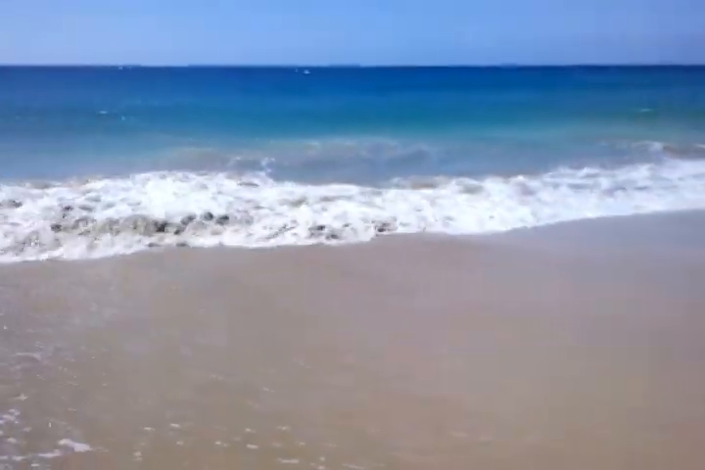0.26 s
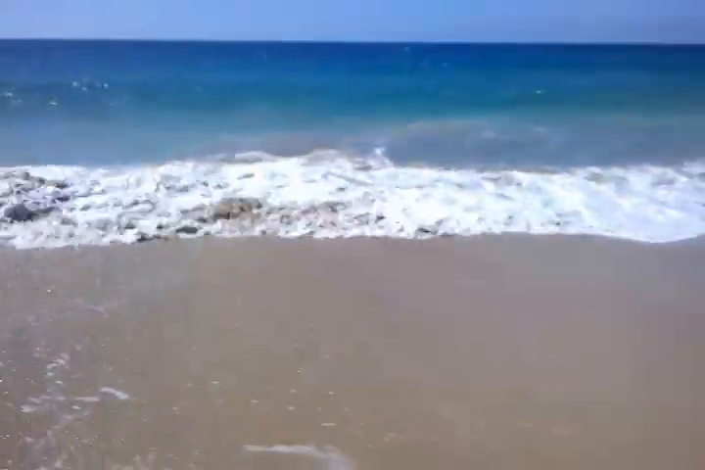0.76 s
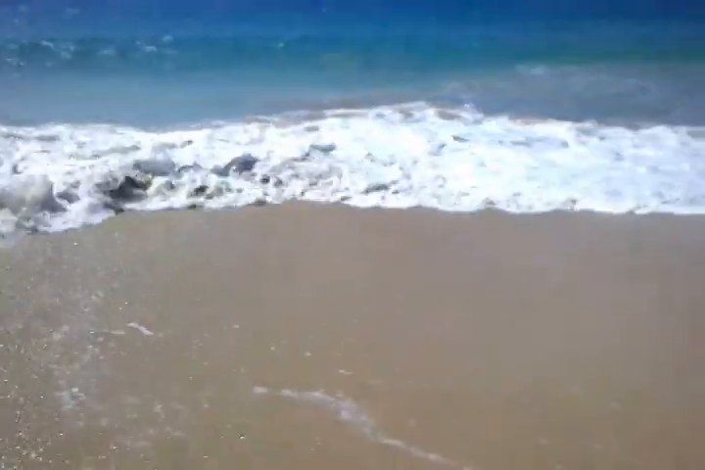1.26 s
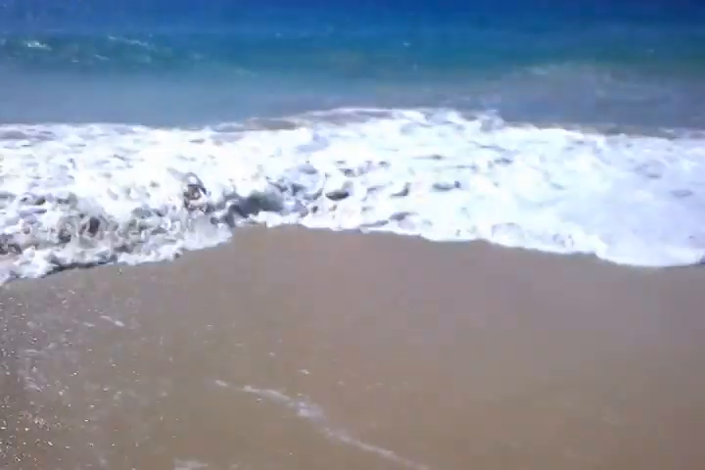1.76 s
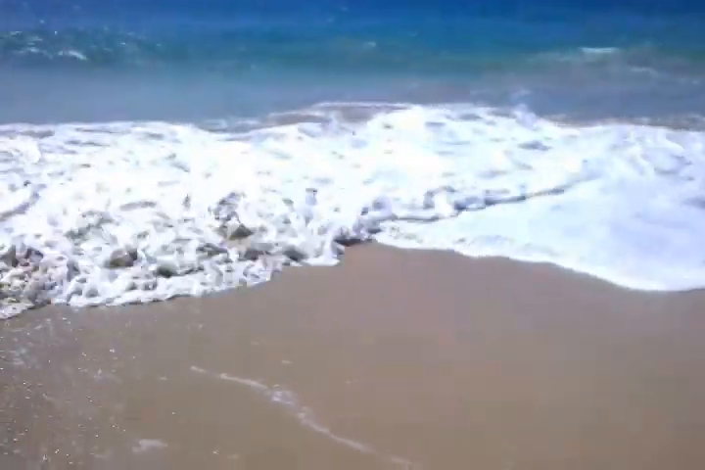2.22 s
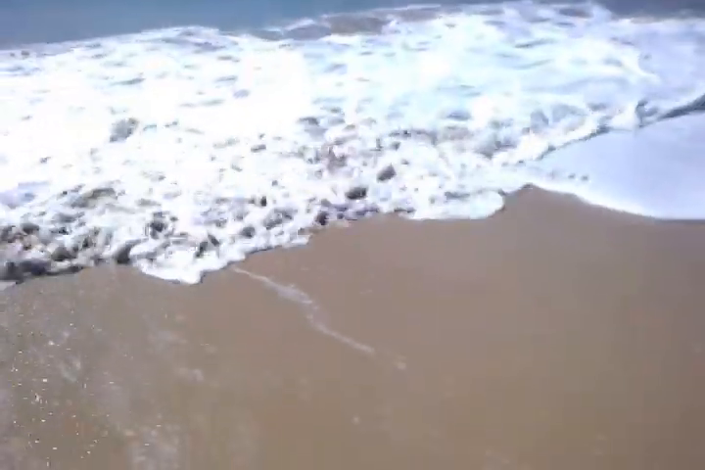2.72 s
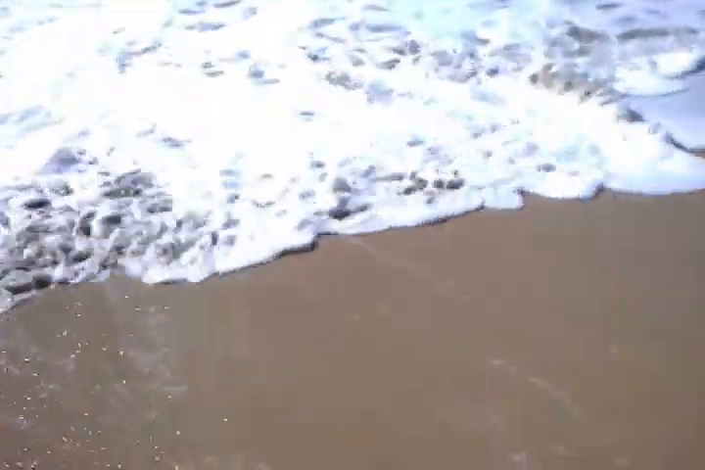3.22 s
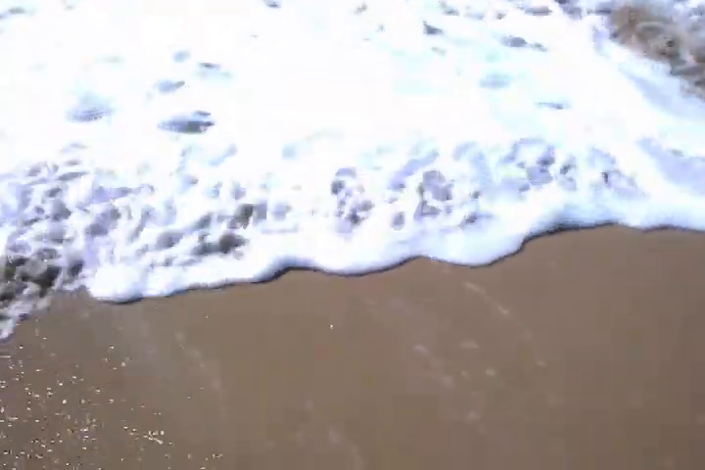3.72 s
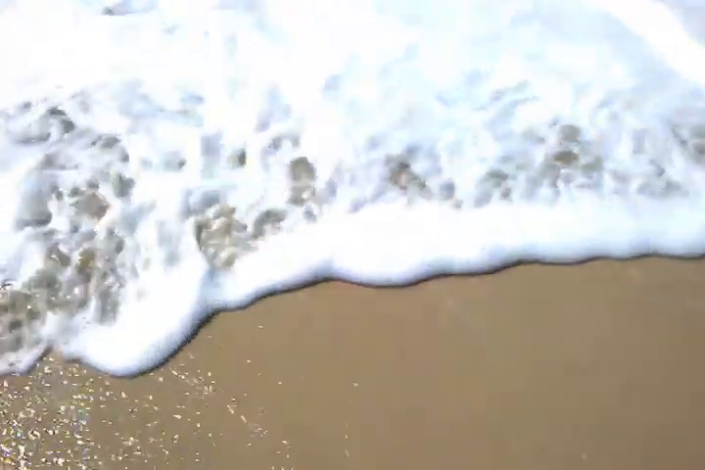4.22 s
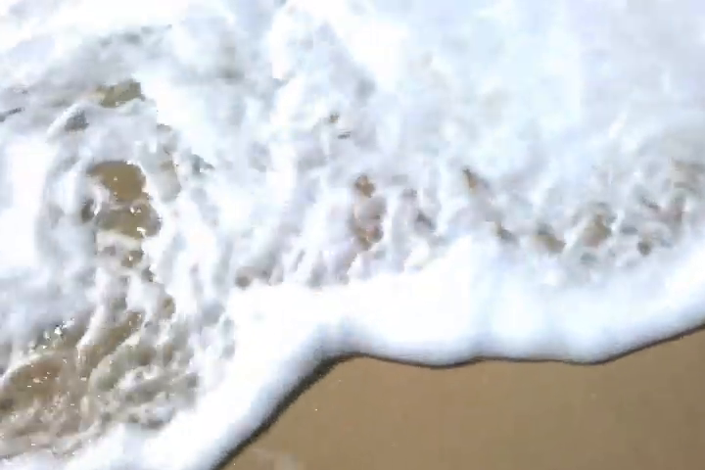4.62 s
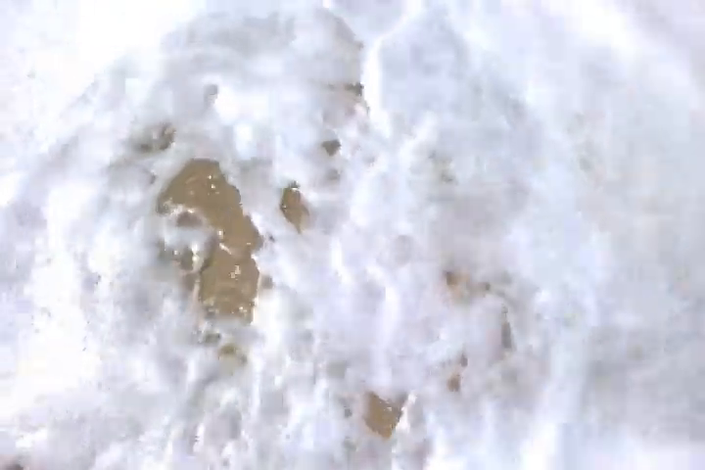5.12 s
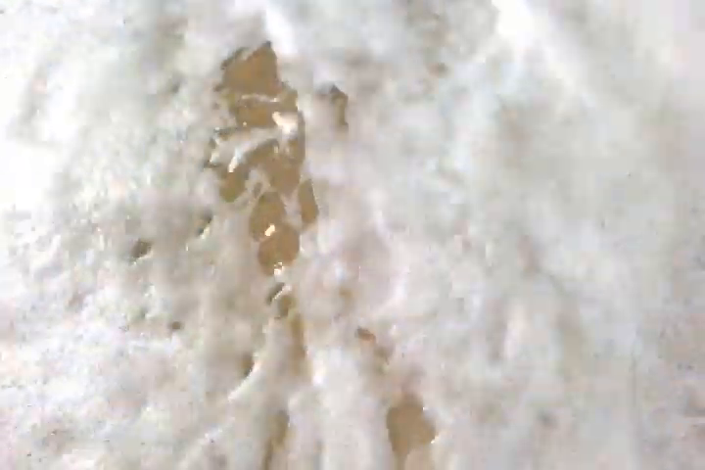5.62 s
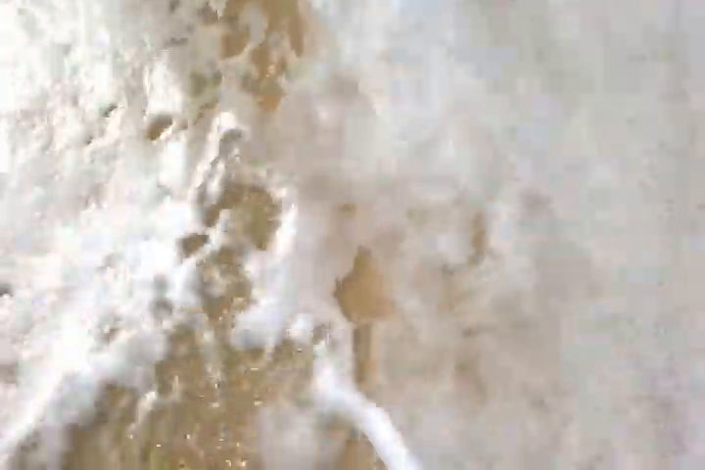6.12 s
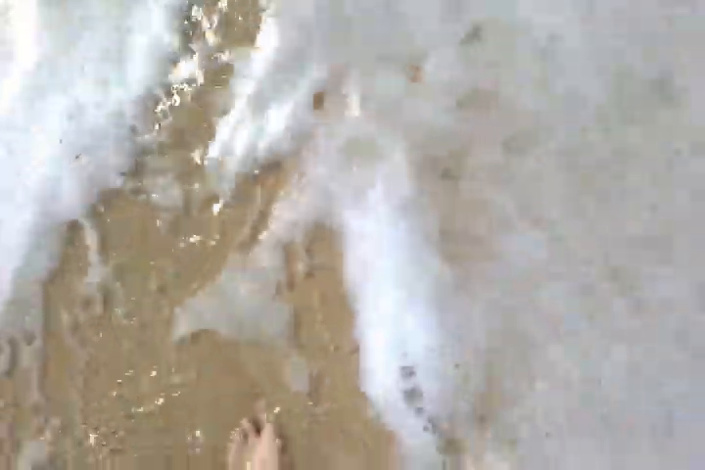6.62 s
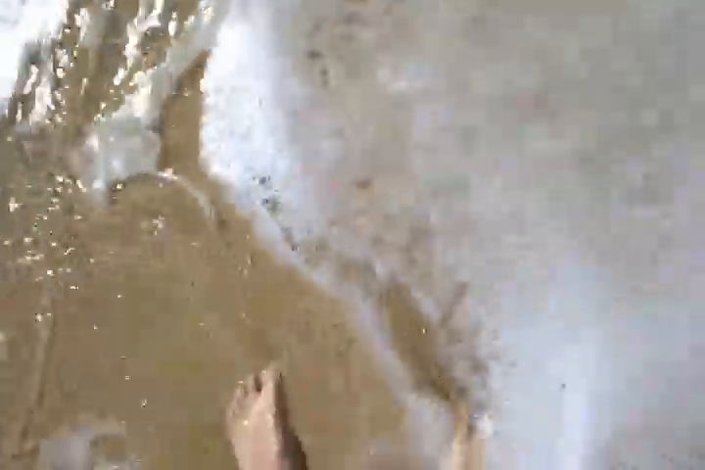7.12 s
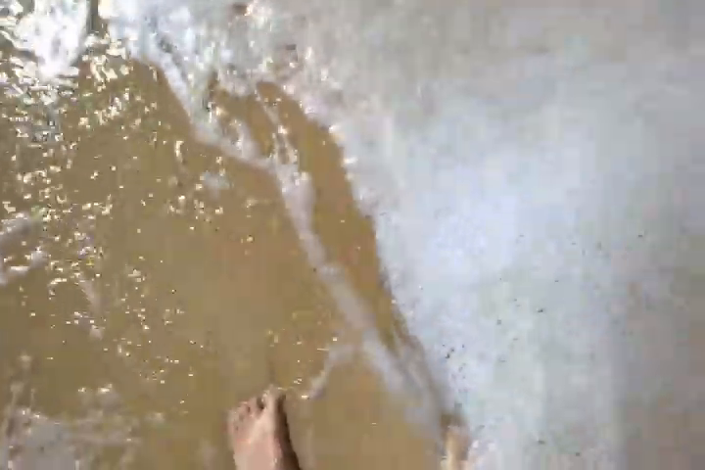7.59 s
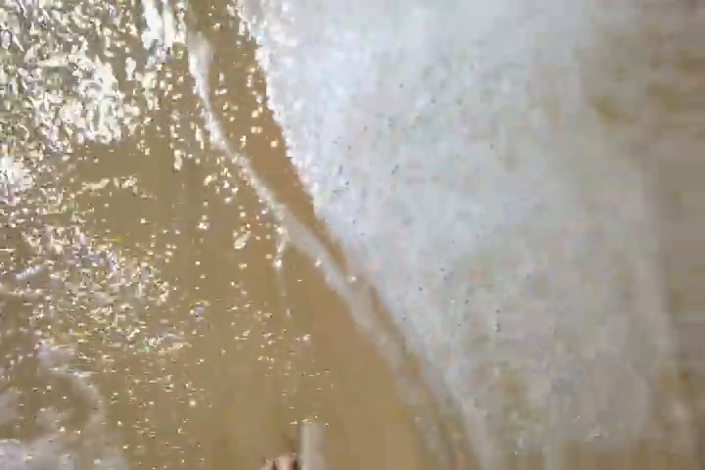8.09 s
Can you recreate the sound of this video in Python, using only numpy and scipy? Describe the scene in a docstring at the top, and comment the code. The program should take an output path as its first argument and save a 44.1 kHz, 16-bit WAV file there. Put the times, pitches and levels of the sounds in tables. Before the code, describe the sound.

Surf rushes on a sandy beach, then drops to a softer wash while a sea breeze thuds on a small hand-held microphone. About halfway through, the wave arrives close by, swelling into a louder churn of hissing, bubbling foam. It falls away again to a faint fizz, and the wind takes over with a flurry of sharp crackles and pops on the microphone.

```python
"""A wave on a windy beach

A broken wave runs up the sand and fizzes out: countless bubbles and churning foam.
A sea breeze thuds, crackles and snaps on the two microphone openings (ports) of a small
hand-held recorder, mostly the right one. The recorder makes its stereo by taking from
each port a slightly delayed copy of the other."""
import sys
import numpy as np
from scipy import signal
from scipy.io import wavfile
from scipy.ndimage import uniform_filter1d

SR = 44100
rng = np.random.default_rng(int(sys.argv[2]) if len(sys.argv) > 2 else 0)


def unload_wav(signal):
    """Save mono or channel-first audio to the path in sys.argv[1] as 16-bit WAV at rate SR, clipped to [-1, 1]."""
    wavfile.write(
        sys.argv[1],
        SR,
        np.round(np.clip(np.atleast_2d(signal).T, -1, 1) * 32767).astype(np.int16),
    )


N = 368226


def from_db(db):
    """Turn decibels into a number to multiply by."""
    return 10 ** (np.asarray(db) / 20)


def unit_level(x):
    """Scale a sound so that its average power is 1."""
    return x / np.sqrt(np.mean(x ** 2) + 1e-20)


def curves(rows):
    """Join a table's rows with straight lines: one value per sample for each column after the time."""
    time_s, *columns = np.transpose(rows)
    return np.array([np.interp(np.arange(N) / SR, time_s, column) for column in columns])


def drift(rate_hz):
    """A slow random wobble, about 1 in size."""
    pole = np.exp(-2 * np.pi * rate_hz * 40 / SR)   # one step per 40 samples
    slow = signal.lfilter([1], [1, -2 * pole, pole ** 2], rng.standard_normal(N // 40 + 2002))[2000:]
    return np.interp(np.arange(N) / 40, np.arange(len(slow)), unit_level(slow))


def passband(x, hz, kind, order=2):
    """Keep the "low" side of hz, the "high" side, or the "band" between two pitches."""
    return signal.sosfilt(signal.butter(order, hz, kind, fs=SR, output="sos"), x)


def between(x, low_hz, high_hz):
    """Cut the lows, then the highs."""
    return passband(passband(x, low_hz, "high"), high_hz, "low")


def clicks(per_s, spread_db):
    """Two channels of random clicks, uneven in size and sign."""
    sizes = from_db(spread_db * np.minimum(rng.exponential(1, (2, N)), 4))
    signs = rng.choice([-1, 1], (2, N))
    return sizes * signs * (rng.random((2, N)) < per_s / SR) + 1e-18


def steadied(x, window_ms):
    """Even out the slow ups and downs of a noise."""
    x = x / x.std()
    return x / np.sqrt(uniform_filter1d(x ** 2, int(window_ms * SR / 1000), axis=-1) + 1e-9)


PART_HZ = (400, 1200, 4500, 11000)   # centres of rumble, wash, hiss and fizz
DIFFUSE_HZ, DIFFUSE_SHARE = 4720, 0.7   # above this pitch, this share is unrelated in each channel
# Level of the surf as heard; it ducks abruptly at 0.56 s and 6.5 s:
# time_s, rumble_db, wash_db, hiss_db, fizz_db
SURF_LEVELS = [(0.0, -23.5, -25, -36, -36.5), (0.28, -26, -27, -35, -37.5), (0.42, -28, -30, -39, -40),
               (0.553, -28.5, -34, -40, -43), (0.566, -36, -41.5, -48.5, -51),
               (0.8, -35.5, -40.5, -49, -50.5), (1.3, -33, -40, -47, -48), (1.55, -38, -43.5, -47, -50),
               (2.3, -38, -41.5, -46, -47), (3.1, -39, -42, -45, -46), (3.6, -33, -43.5, -45.5, -45),
               (4.4, -36.5, -41, -42, -40.5), (4.52, -35.5, -36, -37.5, -39), (4.8, -28.5, -29.5, -33, -32),
               (5.05, -23.5, -31, -33, -32), (5.6, -22, -34.5, -35.5, -33.5), (6.1, -22, -36, -37.5, -35),
               (6.25, -24, -40.5, -41, -39.5), (6.42, -26.5, -36.5, -45, -40),
               (6.5, -33.5, -41.5, -50, -45.5), (7.0, -34, -43, -51, -49.5), (7.6, -38.5, -47, -53, -50.5),
               (8.35, -34, -46.5, -53.5, -50)]
# The surf's tone: pitch_hz, level_db, port_likeness (1 same, -1 or less opposite), right_louder_db
SURF_TONE = [(82, -29, 0.32, -21), (183, -22, 0.97, -13), (357, -25.5, 1, -1), (603, -38.5, 0.84, -15),
             (713, -32, 1, 2), (960, -38.5, -0.08, -8), (1234, -36.5, 0.65, -3.5), (1833, -33, -1.5, 11),
             (2060, -35, -0.015, 9), (2340, -40, 0.17, 4.5), (2750, -41.5, 0.19, -1.5),
             (3870, -38, -0.25, -6), (4820, -42, -0.5, -2.5), (6900, -38, -0.18, -4), (8420, -41, 0, 3),
             (9770, -37.5, 0.094, -8.5), (12150, -45.5, 0.32, -10)]
# Extra level for the deepest rumble: time_s, boost_db
DEEP_RUMBLE = [(0, -9), (.3, 1), (.56, 5.5), (.7, 6.5), (1.5, 6), (2.5, -3.5), (3.2, 2), (4.2, 1.5),
               (5, -1), (5.6, -4), (6.2, -4.5), (6.8, 0.5), (7.4, 1.5), (8.35, -1)]


def surf(slosh_db, flicker_db, grain):
    """Countless bubbles blend into bands of noise. Returns the port sound and the diffuse treble."""
    parts_db, deep_db = curves(SURF_LEVELS), curves(DEEP_RUMBLE)[0]
    tone_hz, *tone = np.transpose(SURF_TONE)
    edges_hz = 74 * 2 ** (np.arange(24) / 3)   # three bands per octave
    noise = rng.standard_normal((2, 4, N))   # two sets, so neighbouring bands use different noise
    noise[:, 0] += grain * unit_level(clicks(per_s=900, spread_db=0.5))   # single bubbles nearby
    noise[:, 0] /= np.sqrt(1 + grain ** 2)
    ports, diffuse_treble = np.zeros((2, 2, N))
    slosh = drift(9.4)
    for band, (low, high) in enumerate(zip(edges_hz, edges_hz[1:])):
        hz = np.sqrt(low * high)
        tone_db, likeness, right_db = (np.interp(np.log(hz), np.log(tone_hz), col) for col in tone)
        likeness = np.clip(likeness, -1, 1)
        part_mix = [np.interp(np.log(hz), np.log(PART_HZ), part) for part in np.eye(4)]
        wobble_db = slosh_db * slosh + flicker_db * drift(13.8)
        wobble_db *= (1000 / hz) ** 0.071   # fine fizz is the steadiest
        boost_db = np.interp(hz, (130, 260), [1, 0]) * deep_db   # fades out from 130 to 260 Hz
        gain = from_db(part_mix @ parts_db + boost_db + tone_db + wobble_db) * np.sqrt(SR / 2)
        share = DIFFUSE_SHARE * (hz > DIFFUSE_HZ)
        band_noise = gain * passband(noise[band % 2, :4 if share else 2], [low, high], "band")
        same = np.sqrt((1 + likeness) / 2) * band_noise[0]
        opposite = np.sqrt((1 - likeness) / 2) * band_noise[1] * [[1], [-1]]
        ports += np.sqrt(1 - share) * (same + opposite) * from_db([[-right_db / 2], [right_db / 2]])
        if share:
            diffuse_treble += np.sqrt(2 * share) * band_noise[2:]
    return ports, diffuse_treble


# The breeze at both ports: time_s, level_db, boom_share (0 all thud, 1 all boom)
BREEZE_LEVELS = [(0, -27, 0.92), (.3, -32, 0.92), (.52, -22, 0.99), (.65, -34, 0.34), (1.1, -31, 0.7),
                 (1.4, -35, 0.1), (1.7, -33.5, 1), (2.4, -35, 0.93), (2.9, -29.5, 0.96), (3.5, -33, 0.96),
                 (4.2, -30.5, 0.23), (4.5, -27.5, 0.57), (5.3, -33.5, 0.53), (5.8, -41, 0.16),
                 (6.3, -33, 0.4), (6.6, -44, 0.18), (7.3, -29, 0.5), (7.8, -39, 0.18), (8.35, -30.5, 0.55)]
# Puffs on the right port: peak_s, level_db, length_ms, crackle_db (compared with the puff)
WIND_PUFFS = [(0.301, -15, 14, -30), (0.352, -15, 21, -10), (0.508, -18, 7.4, -30), (0.551, -8, 8.7, -24),
              (0.575, -15, 10, -25), (0.586, -5, 2.9, -21), (0.661, -20, 14, -11), (0.687, -13.5, 18, -24),
              (0.727, -19, 38, -32), (0.818, -20, 14, -28), (0.877, -12.5, 8.2, -23), (0.948, -12, 18, -38),
              (1.053, -16, 8.1, -30), (1.1, -15.5, 49, -38), (1.189, -25, 27, -30),
              (1.225, -21.5, 38, -7.5), (1.286, -11, 9.4, -42), (1.323, -12, 12, -35),
              (1.361, -17.5, 45, -17), (1.399, -13, 19, -22), (1.439, -11.5, 11, -22),
              (1.465, -24, 14, -30), (1.622, -20, 36, -26), (1.648, -24, 28, -27), (2.735, -21, 22, -30),
              (2.957, -22, 12, -32), (3.21, -24, 17, -34), (3.247, -13.5, 7.6, -37), (3.407, -17, 48, -29),
              (3.542, -21, 27, -30), (3.615, -18.5, 22, -34), (3.651, -20, 31, -35), (3.71, -13, 5, -34),
              (3.988, -12.5, 6.5, -36), (4.04, -21.5, 24, -29), (4.407, -16, 14, -29),
              (4.535, -20, 40, -27), (5.055, -19, 21, -28), (5.209, -17, 7, -30), (5.506, -16, 38, -30),
              (6.204, -18, 12, -8), (6.271, -15, 14, -29), (6.425, -9.5, 12.5, -11),
              (6.451, -16.5, 24, -14), (6.486, -16, 29, -6), (6.661, -15, 31, -13), (6.674, -22, 7.4, -2),
              (6.743, -12, 9.9, -11), (6.776, -23, 7.9, -6), (6.849, -12, 5.6, -11), (6.864, -13, 3.6, -5),
              (6.889, -10, 4.8, -2), (6.97, -20, 5.3, -10), (6.978, -16, 5.8, -7.5), (7.004, -19.5, 14, -4),
              (7.017, -13, 11, -10), (7.048, -13.5, 6, -18), (7.11, -15.5, 6.6, 0), (7.157, -22, 12, -7),
              (7.191, -14, 23, -11), (7.212, -16, 19, -7), (7.231, -16, 22, -3.5), (7.252, -16.5, 35, -8),
              (7.277, -19, 23, -7), (7.294, -16, 8, -3), (7.304, -21, 49, -4), (7.336, -18, 17, 1.5),
              (7.349, -15.5, 11, 1.5), (7.362, -20, 19, -2), (7.378, -19.5, 22, -0.5), (7.394, -20, 7, 7),
              (7.407, -21, 7.3, -3), (7.492, -21, 28, -14), (7.509, -19.5, 14, -1), (7.527, -15, 18, -4),
              (7.589, -22, 11, -7), (7.739, -20.5, 16, -21), (7.837, -17, 10, -5.5),
              (7.881, -21.5, 42, -27), (8.118, -22, 11, -12), (8.141, -17, 12, -11), (8.153, -15, 9, -16),
              (8.164, -15, 4.8, -12), (8.216, -31, 29, 2), (8.251, -10, 12, -7), (8.263, -15, 9.2, -3),
              (8.276, -15, 3.5, -11), (8.287, -18, 5, -12), (8.299, -24, 6.6, -7), (8.325, -32, 8, 0)]


def wind(wobble_db, crackle_db):
    """Slow air sheds big swirls that boom, fast air small ones that thud; hard puffs make them crackle."""
    swirls = clicks(per_s=700, spread_db=5.5)
    breeze_db, boom_share = curves(BREEZE_LEVELS)
    boom_share = np.clip(boom_share, 0, 1)
    boom = unit_level(between(swirls, low_hz=91, high_hz=157))
    thud = unit_level(between(swirls, low_hz=157, high_hz=300))
    buffet = steadied(np.sqrt(boom_share) * boom - np.sqrt(1 - boom_share) * thud, window_ms=16.2)
    crackle = passband(between(swirls, low_hz=291, high_hz=497), 2200, "low")
    crackle = steadied(crackle, window_ms=11.9)
    side_db = np.array([[0.5], [-0.5]])   # left, right
    breeze = from_db(breeze_db + side_db + wobble_db * np.array([drift(4.7), drift(3.4)]))
    buffet_power, crackle_power = breeze ** 2, (breeze * from_db(crackle_db)) ** 2
    for peak_s, level_db, length_ms, puff_crackle_db in WIND_PUFFS:
        at = np.arange(max(int((peak_s - .1) * SR), 0), min(int((peak_s + .1) * SR), N))
        width_s = np.where(at / SR < peak_s, .7, 1.3) * length_ms / 2500   # comes faster than it goes
        bump = np.exp(-.5 * ((at / SR - peak_s) / width_s) ** 2)
        buffet_power[1, at] += bump * from_db(2 * level_db)
        crest = bump ** 2.4   # only the top of the puff crackles
        crackle_power[1, at] += crest * from_db(2 * (level_db + puff_crackle_db))
    buffet = passband(buffet * np.sqrt(buffet_power), 442, "low", order=4)
    buffet = passband(buffet, 57, "high", order=1)
    return buffet + crackle * np.sqrt(crackle_power)


def water_drop(start_s, level_db, pitch_hz, fade_s):
    """One bright drop at both ports: a ring, roughened by noise, that dies by 60 dB in fade_s."""
    t = np.arange(1500) / SR
    ring = from_db(level_db - 60 * t / fade_s) * np.sin(2 * np.pi * pitch_hz * t)
    roughness = unit_level(passband(rng.standard_normal(len(t)), 360, "low"))
    start = int(start_s * SR)
    return np.pad(ring * roughness, (start, N - start - len(t)))


SNAP_RISE_CYCLES, SNAP_FALL_CYCLES, SNAP_TOP_HZ = 0.38, 0.34, 1450
CRACK_LOW_HZ, CRACK_HIGH_HZ, CRACK_10_DB_MS = 1190, 2270, 0.46
# Sharp snaps of wind: peak_s, level_db, pitch_hz, crack_db (compared with the snap)
WIND_SNAPS = [(0.5045, -12, 533.0, -12), (0.5501, -7, 531.0, -17), (0.587, -8.5, 435, -27),
              (0.6626, -15, 552.0, -17), (0.685, -15, 471.0, -16), (0.6951, -15, 460.0, -20),
              (0.7473, -16, 371.0, -14), (0.9468, -13.8, 408.0, -22), (1.091, -18, 384.0, -19),
              (1.2064, -14, 543.0, -16), (1.2326, -20, 410.0, -21), (1.3274, -13.1, 417.0, -19),
              (1.399, -8.5, 450.0, -25), (1.4419, -9, 390.0, -26), (1.4626, -25, 380.0, -15),
              (1.6174, -15, 593.0, -20), (6.202, -11, 471.0, -11), (6.2078, -4, 535, -19),
              (6.2826, -21, 482.0, -11), (6.4298, -5, 410.0, -24), (6.4352, -11.8, 409.0, -22),
              (6.446, -10, 440.0, -23), (6.4578, -8, 490.0, -21), (6.4866, -7, 566.0, -22),
              (6.524, -15.5, 681.0, -13), (6.6446, -16, 438.0, -15), (6.6487, -16, 456.0, -20),
              (6.6563, -20, 417.0, -21), (6.6631, -20, 733.0, -12), (6.6725, -7.5, 501.0, -24),
              (6.677, -19, 655.0, -16), (6.7395, -10, 522.0, -12), (6.7443, -6.5, 722.0, -5),
              (6.7485, -16.5, 487.0, -16), (6.7723, -23, 900.0, 0), (6.7775, -16, 646.0, -9),
              (6.8499, -14, 484.0, -22), (6.8641, -4, 488.0, -13), (6.889, -9, 467.0, -13),
              (6.9708, -14.5, 499.0, -22), (6.9776, -12, 661.0, -8), (7.0015, -15, 436.0, -22),
              (7.0064, -17, 571.0, -17), (7.0095, -20, 470.0, -16), (7.015, -8.8, 460.0, -17),
              (7.0202, -14, 467.0, -11), (7.0243, -14, 820.0, -7), (7.0482, -12.2, 494.0, -23),
              (7.1117, -7.9, 562.0, -21), (7.1685, -21, 900.0, -3), (7.1939, -26, 900.0, -1),
              (7.2056, -22, 900.0, -3), (7.2114, -16, 464.0, -20), (7.2269, -8, 814.0, -12),
              (7.2321, -7.7, 575.0, -17), (7.2432, -7.8, 542.0, -25), (7.2477, -4, 551.0, -23),
              (7.2614, -9, 499.0, -28), (7.2716, -9, 476.0, -21), (7.2823, -9, 437.0, -23),
              (7.2938, -12, 625.0, -12), (7.3058, -5, 531.0, -26), (7.3141, -11, 494.0, -16),
              (7.323, -7, 488.0, -25), (7.3357, -17, 900.0, 0), (7.3426, -8.5, 612.0, -16),
              (7.3502, -9, 552.0, -20), (7.3583, -14, 520.0, -21), (7.3743, -16, 900.0, 0),
              (7.3795, -15, 474.0, -21), (7.3843, -25, 900.0, -3), (7.3944, -13, 658.0, -9),
              (7.4076, -8.5, 575.0, -19), (7.415, -15, 560.0, -21), (7.4945, -14, 469.0, -15),
              (7.5075, -14, 516.0, -15), (7.5123, -18, 900.0, 2), (7.515, -25, 497.0, -13),
              (7.5236, -17, 547, -13), (7.5301, -9, 617.0, -11), (7.5426, -15, 965.0, -4),
              (7.8311, -17, 504.0, -18), (7.8412, -6, 446.0, -26), (8.1436, -10, 397.0, -26),
              (8.155, -14.5, 468.0, -23), (8.1654, -13, 440.0, -26), (8.2146, -22, 900.0, 0),
              (8.2327, -29, 900.0, -3), (8.2488, -4, 624.0, -17), (8.2529, -14, 526.0, -21),
              (8.2613, -17, 900.0, -4), (8.2649, -5.5, 544.0, -16), (8.27, -8, 561.0, -21),
              (8.2773, -8, 493.0, -25), (8.298, -13, 531.0, -25), (8.323, -19.5, 672.0, -8),
              (8.328, -19.1, 489.0, -20)]


def wind_snaps():
    """A swirl bursts on the right port: a dull pressure spike of about one cycle, topped by a crack."""
    offsets = np.arange(-300, 300)   # samples around the peak
    t = offsets / SR
    spikes, cracks = np.zeros((2, N + SR))
    for peak_s, level_db, pitch_hz, crack_db in WIND_SNAPS:
        direction, lean, crack_pick = rng.random(3)
        phase = np.round(direction) / 2 + (lean - .5) / 4   # pushes or pulls, a little lopsided
        at, cycles = int(peak_s * SR) + offsets, t * pitch_hz
        swell = np.exp(-abs(cycles) / np.where(cycles < 0, SNAP_RISE_CYCLES, SNAP_FALL_CYCLES))
        spikes[at] += from_db(level_db) * swell * np.cos(2 * np.pi * (cycles + phase))
        crack_hz = CRACK_LOW_HZ * (CRACK_HIGH_HZ / CRACK_LOW_HZ) ** crack_pick
        crack_swell = from_db(level_db + crack_db - 10 * abs(t) * 1000 / CRACK_10_DB_MS)
        cracks[at] += crack_swell * np.cos(2 * np.pi * (crack_hz * t + phase))
    right = passband(spikes + 1e-18, SNAP_TOP_HZ, "low") + cracks
    return np.array([np.zeros(N), right[:N]])


# The foam close by, loudest as the wave arrives: time_s, level_db
FOAM_LEVELS = [(0, -61), (4.44, -68), (4.52, -43), (4.7, -46.5), (4.85, -36), (5.2, -40.5), (5.6, -43),
               (6.1, -41), (6.35, -45), (6.5, -53), (8.35, -70)]


def foam(churn_db, band_hz):
    """Foam close by churns with a hollow sound in a narrow band, the same at both ports."""
    swell = from_db(curves(FOAM_LEVELS)[0] + churn_db * drift(15.0))
    return swell * unit_level(passband(rng.standard_normal(N), band_hz, "band", order=3))


def scene():
    """Each channel is its port minus the other one delayed, so shared sound cancels at some pitches."""
    ports, diffuse_treble = surf(slosh_db=0.09, flicker_db=1.79, grain=0.43)
    ports += wind(wobble_db=3.0, crackle_db=-14)
    ports += foam(churn_db=1.0, band_hz=(1135, 1605))
    ports += wind_snaps()
    ports += water_drop(start_s=0.098, level_db=-29, pitch_hz=4250, fade_s=0.026)
    other_port = np.pad(ports, ((0, 0), (15, 0)))[::-1, :N]   # sides swapped, 15 samples late
    return ports - other_port + passband(diffuse_treble, DIFFUSE_HZ, "high", order=8)


def record(dry):
    """The left channel is a little weaker; sound below 9.1 Hz and above 14000 Hz is cut."""
    dry = passband(dry * from_db([[-0.4], [0]]), 9.1, "high")
    return signal.sosfilt(signal.ellip(12, .5, 70, 14000, fs=SR, output="sos"), dry)


dry = scene()
out = record(dry)
unload_wav(out)
```